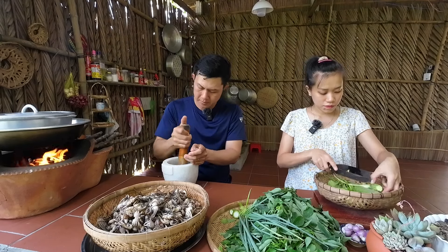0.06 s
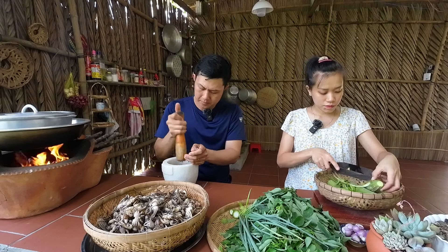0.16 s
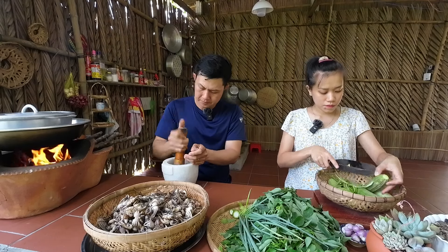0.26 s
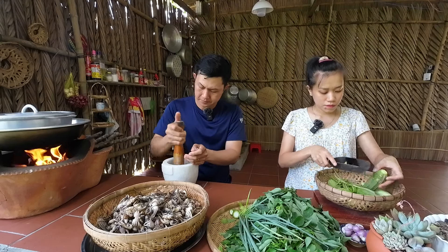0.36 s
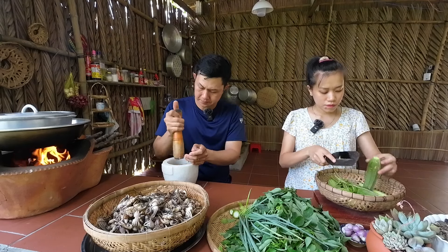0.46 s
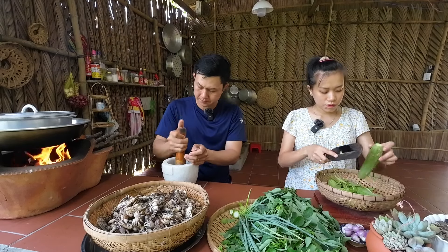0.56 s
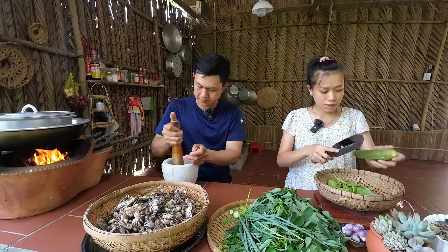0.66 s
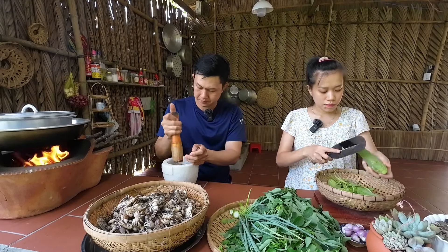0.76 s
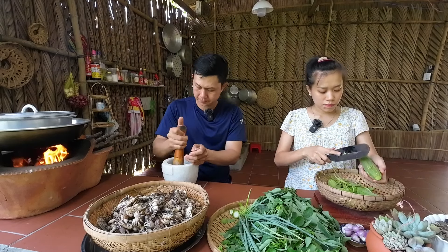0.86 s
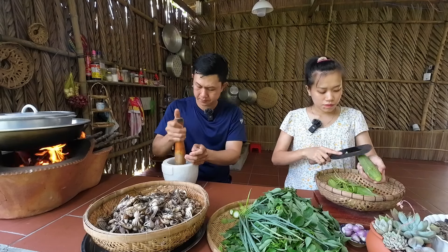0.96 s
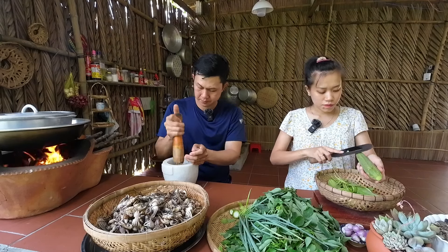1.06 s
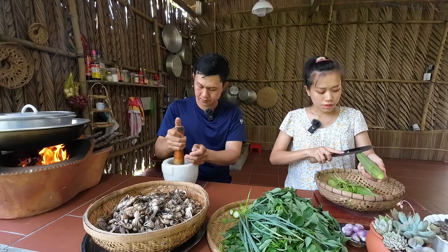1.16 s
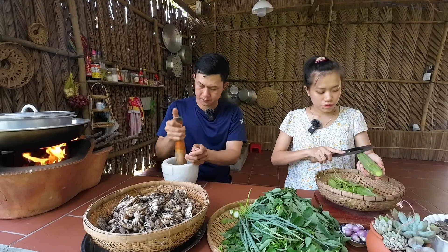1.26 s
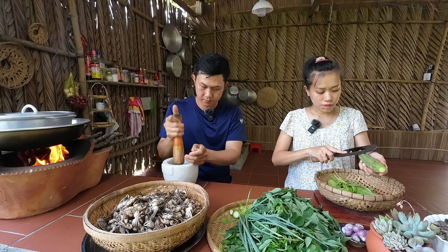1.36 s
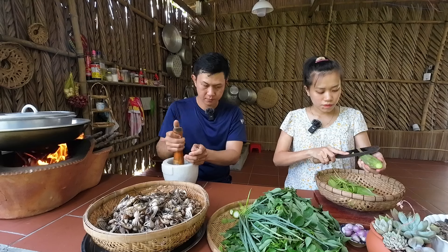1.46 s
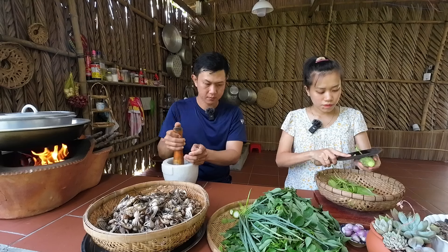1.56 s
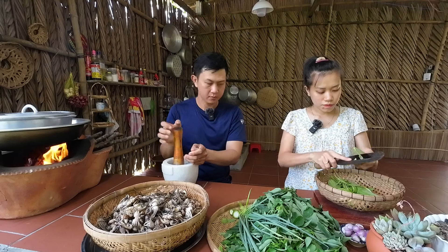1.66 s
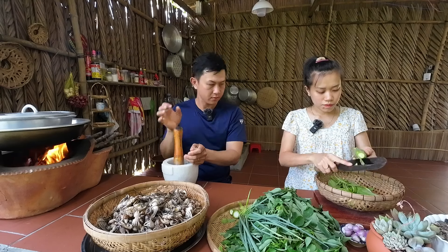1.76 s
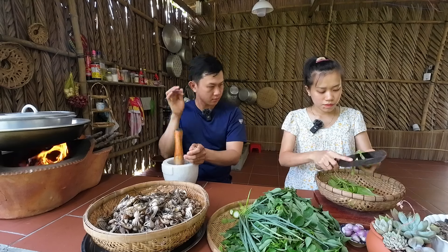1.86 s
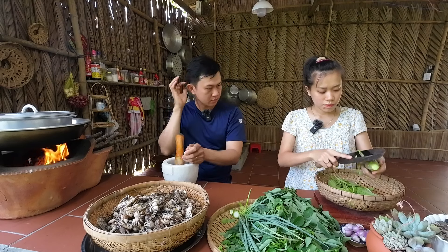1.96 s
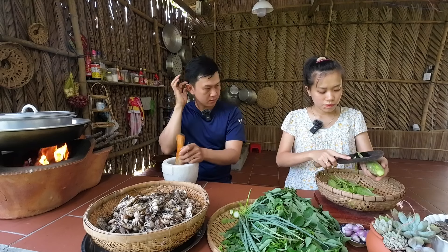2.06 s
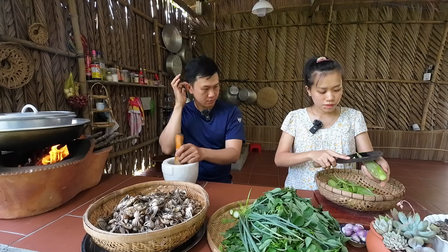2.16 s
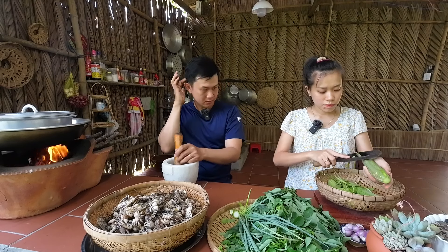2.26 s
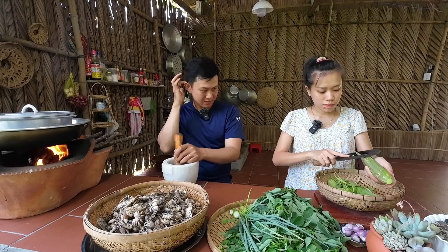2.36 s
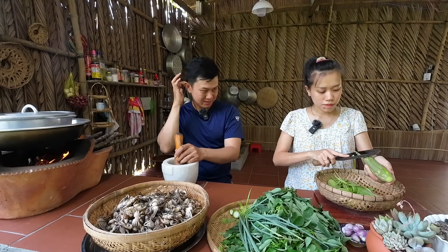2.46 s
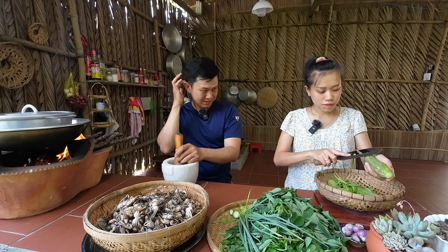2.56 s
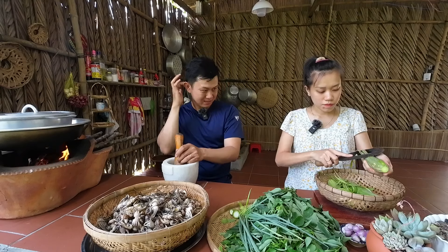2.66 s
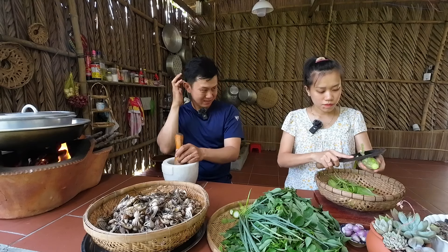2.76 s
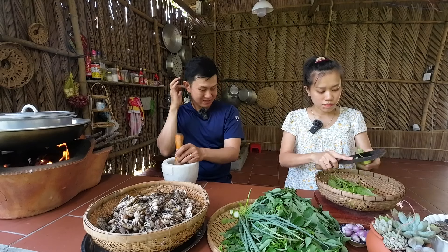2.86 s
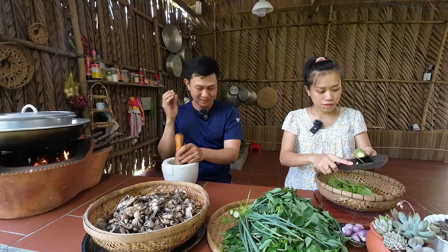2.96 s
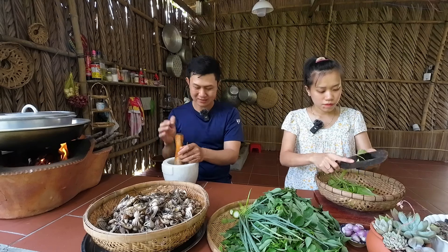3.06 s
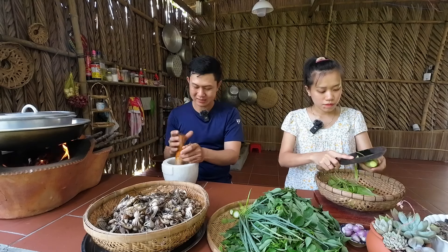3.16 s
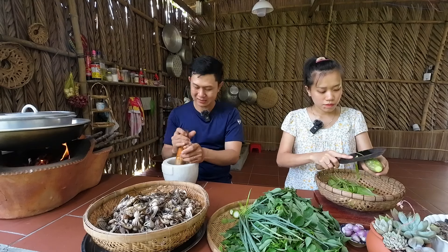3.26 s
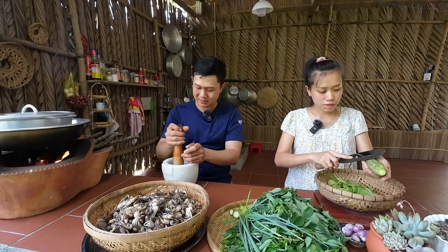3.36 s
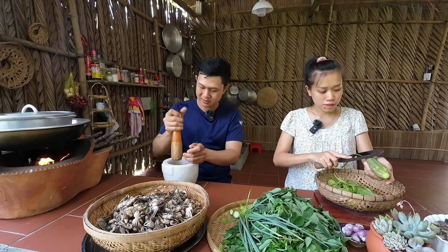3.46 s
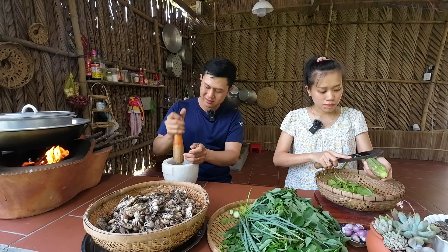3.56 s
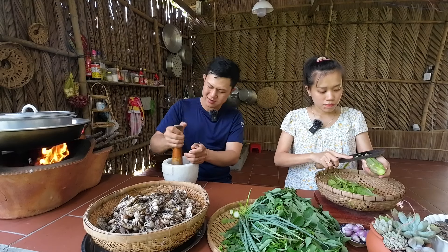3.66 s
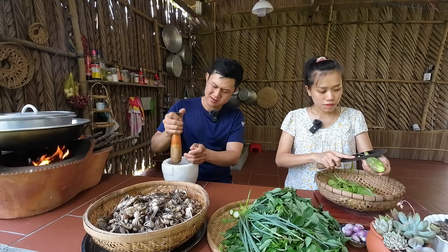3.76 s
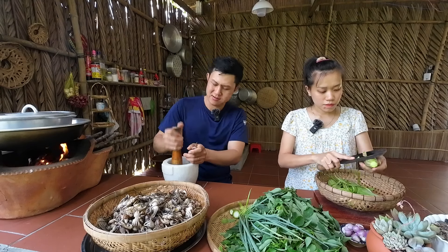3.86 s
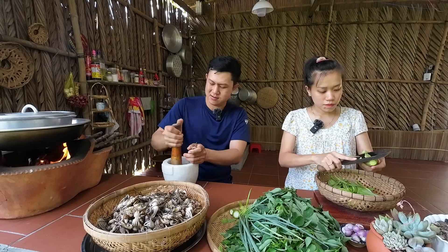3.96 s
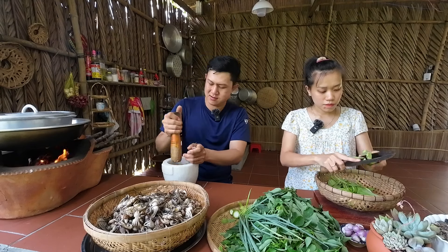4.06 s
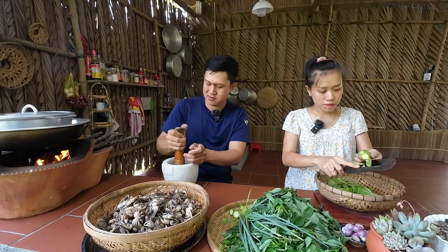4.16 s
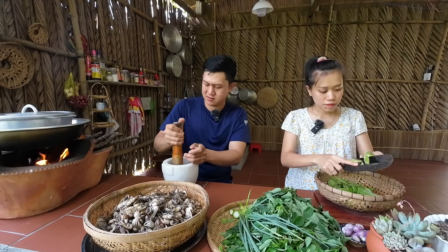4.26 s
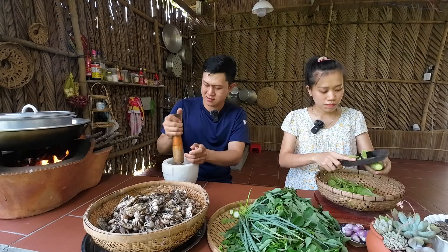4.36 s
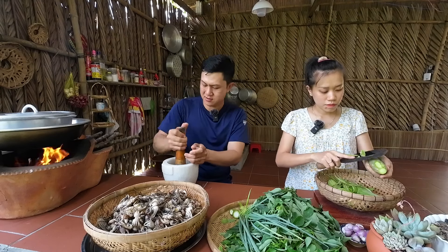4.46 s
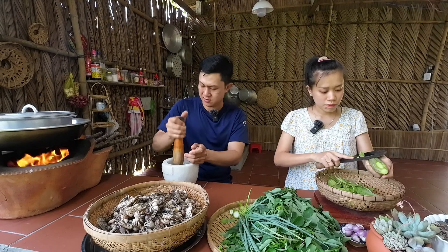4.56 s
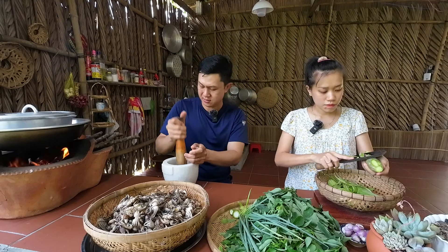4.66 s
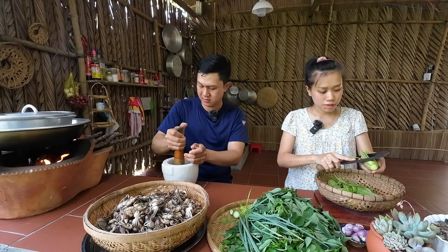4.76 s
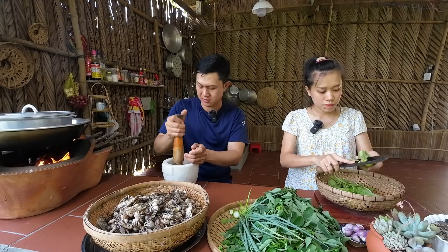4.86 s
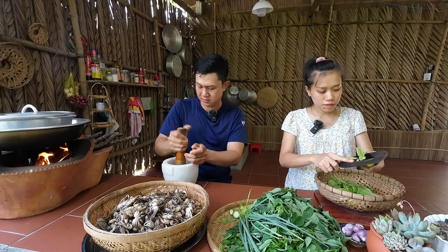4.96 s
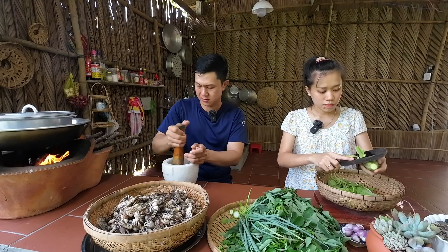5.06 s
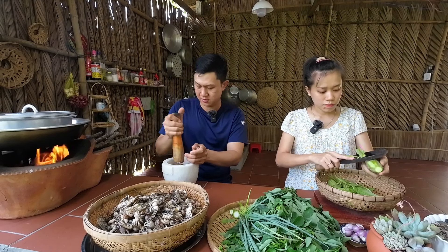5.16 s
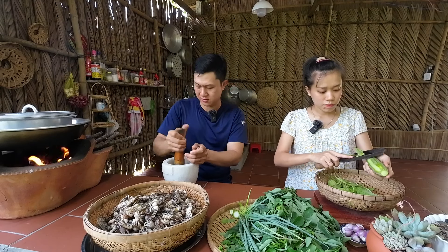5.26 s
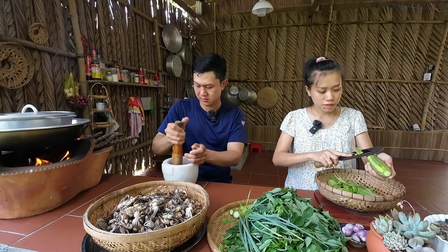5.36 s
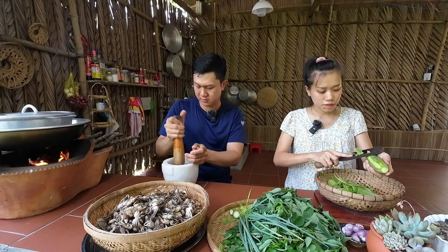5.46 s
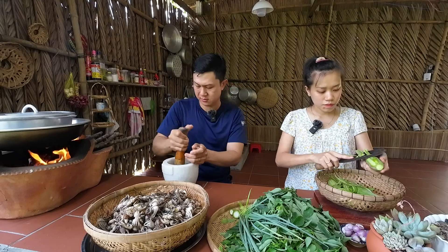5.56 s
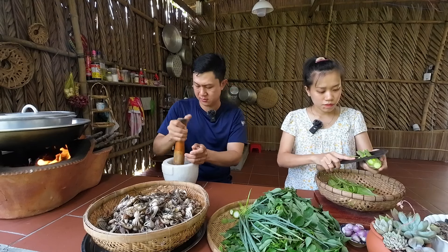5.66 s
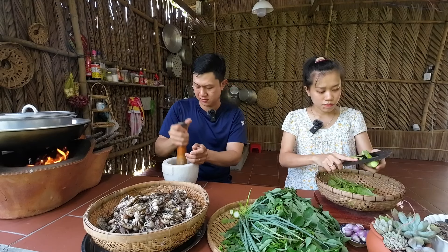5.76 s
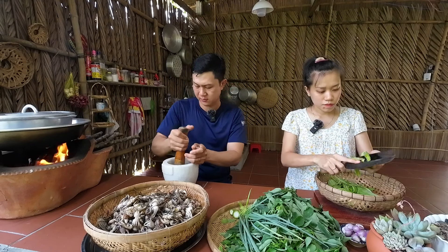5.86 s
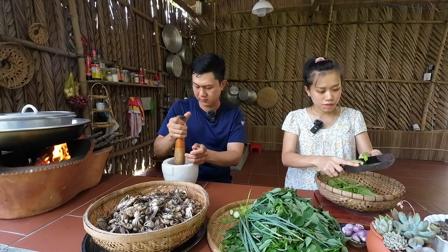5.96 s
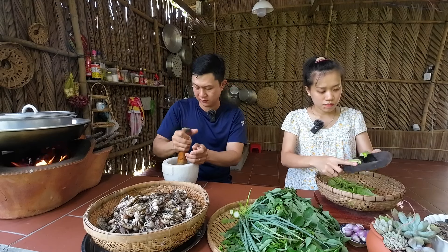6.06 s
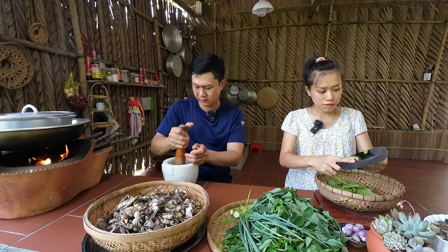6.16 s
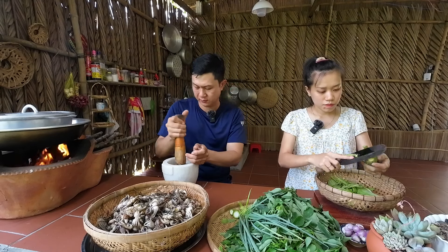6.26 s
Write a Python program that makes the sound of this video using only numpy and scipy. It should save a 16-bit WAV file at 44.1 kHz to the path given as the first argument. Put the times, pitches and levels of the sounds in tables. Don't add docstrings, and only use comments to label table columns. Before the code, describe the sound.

Crisp shell crunches and stone knocks come at a steady pace, with splinters snapping and crumbs settling. They stop after a second and a half; the pestle clatters loosely and only peeling strokes, small taps and low fire noise remain. A short scrape restarts the pounding, now deeper, pastier, ringing and distorted at the peaks. Close microphone, short dry echo from thatch and tiles.

```python
import sys
import numpy as np
from scipy import signal
from scipy.fft import rfft, irfft
from scipy.io import wavfile
from scipy.ndimage import uniform_filter1d

SR = 44100
rng = np.random.default_rng(int(sys.argv[2]) if len(sys.argv) > 2 else 0)


def undo_db(level):
    steps = np.asarray(level, float) / 20
    return 10 ** steps


def dump(signal):
    limited = np.clip(np.atleast_2d(signal).T, -1, 1)
    pcm = np.round(limited * 32767).astype(np.int16)
    wavfile.write(sys.argv[1], SR, pcm)


N = 279064

# first touch of shell in [s], stone contact level in [dB], crush time in [ms],
# crunch level in [dB], pitch of the shell cups in [Hz].
PESTLE_BLOWS = [(0.0144, -15, 5.9, 4, 1890), (0.3017, -15.5, 4.3, 2.5, 2860), (0.5767, -17.5, 7.1, 1, 1840),
                (0.8574, -14, 6.5, 5, 2000), (1.1475, -10.5, 5.4, 3, 1750), (1.4476, -1, 2.95, 4.5, 1580),
                (3.648, -1.5, 3.3, 2.5, 1830), (3.9097, -7.5, 2.27, 3.5, 3000),
                (4.183, -3.5, 4.4, 3.5, 1710), (4.4617, 0.5, 2.65, 4.5, 1840), (4.7383, 2.5, 2.6, 5, 1790),
                (5.0073, 10, 3.3, 4, 1370), (5.2765, 1.9, 2.06, 4.5, 1750), (5.5534, 10, 3.8, 6, 1630),
                (5.8251, 0.2, 3.4, -6.5, 1640), (6.0941, 4.5, 3.1, -1.5, 1790)]
STONE_AFTER_S = .0022
CUP_HZ = 1750


def evened(x):
    return x / np.sqrt(np.mean(x ** 2) + 1e-20)


def read(points, hz):
    f, value = np.transpose(points)
    return np.interp(np.log(hz + 1), np.log(f + 1), value)


def add(mix, s, sound):
    part = mix[max(round(s * SR), 0):][:len(sound)]
    part += sound[:len(part)]


def resonate(x, hz, width):
    turn = np.exp(2j * np.pi * hz * np.arange(len(x)) / SR)
    r = np.exp(-np.pi * width / SR)
    return 2 * (turn * signal.lfilter([1 - r], [1, -r], x / turn)).real


def through(x, peaks):
    return sum(undo_db(db) * resonate(resonate(x, hz, w), hz, w) for hz, w, db in peaks)


def crackle(size, spread_db, density):
    luck = rng.random((size, 3))
    height = undo_db(-spread_db * np.log(1 - luck[:, 0]))
    sign = np.sign(luck[:, 1] - .5)
    return evened(height * sign * (luck[:, 2] < density))


def ring(hz, db, t60, swing, uneven_db):
    t = np.arange(SR // 3)[:, None] / SR
    db = db + uneven_db * rng.standard_normal(len(hz))
    soft = 1 - np.exp(-(t / .0002) ** 2)
    return (swing * soft * undo_db(db - 60 * t / t60) * np.sin(2 * np.pi * hz * t)).sum(1)


def air():
    # frequency in [Hz], level in [dB per Hz].
    colour = [(15, -46), (25, -10), (53, -10.5), (185, -1), (317, -6), (373, -4), (531, -7), (775, -6.5),
              (1130, -9.5), (2000, -14), (2220, -14.5), (2690, -16.5), (16000, -28.5)]
    air_db = -42
    frames, hz = N // 256 + 5, np.fft.rfftfreq(1024, 1 / SR)
    a, b, patches = rng.standard_normal((frames, 513, 3)).T
    patches = evened(uniform_filter1d(uniform_filter1d(patches, 14, 0), 12, 1))
    z = (a + 1j * b) * undo_db(read(colour, hz)[:, None] + 1.3 * patches)
    return undo_db(air_db - 2.5) * evened(signal.istft(z, nperseg=1024, noverlap=768)[1][:N])


def hut(x):
    # frequency in [Hz], t60 in [s].
    reverb = [(100, 0.34), (260, 0.4), (700, 0.17), (1840, 0.34), (4850, 0.47), (12800, 0.32)]
    taps = np.zeros(SR // 2)
    at = np.arange(300, len(taps) - 20, 20)
    taps[at + rng.integers(0, 20, len(at))] = rng.choice([-1., 1.], len(at))
    hz, t, z = signal.stft(taps, SR, nperseg=256)
    tail = signal.istft(z * undo_db(-60 * t / read(reverb, hz)[:, None]), SR, nperseg=256)[1]
    return signal.fftconvolve(x, tail / np.linalg.norm(tail))[:N]


def bird():
    # start of the held note in [s], level in [dB], pitch in [Hz], held time in [s].
    whistles = [
        (.13, -45.5, 1130, 0.04),
        (.75, -36, 1193, .003),
    ]
    rise_s, fall_s, echo_s, echo_db = 0.029, 0.028, 0.077, -19
    scoop = 0.029
    mix = np.zeros(N)
    for s, db, hz, held_s in whistles:
        corners = np.cumsum([0, rise_s, held_s, fall_s, echo_s])
        t = np.arange(0, corners[-1], 1 / SR)
        shape_db = np.interp(t, corners, [echo_db, 0, 0, echo_db, echo_db])
        pitch = hz * (1 - scoop * np.exp(-t / rise_s))
        tone = np.sin(2 * np.pi * np.cumsum(pitch) / SR)
        add(mix, s - rise_s, undo_db(db + shape_db) * tone)
    return mix


def hiss(spectrum, patchy_db, flicker_db):
    frames, hz = N // 128 + 5, np.fft.rfftfreq(512, 1 / SR)
    a, b, patches = rng.standard_normal((frames, 257, 3)).T
    patches = evened(uniform_filter1d(uniform_filter1d(patches, 5, 0), 18, 1))
    flicker = evened(uniform_filter1d(rng.standard_normal(frames), size=3))
    z = (a + 1j * b) * undo_db(read(spectrum, hz)[:, None] + patchy_db * patches + flicker_db * flicker)
    return evened(signal.istft(z, nperseg=512, noverlap=384)[1][:N])


def knife():
    # start in [s], end in [s], level in [dB], swell over the stroke in [dB].
    pushes = [(0.235, 0.268, -42, 2), (1.352, 1.557, -44, 5), (1.564, 1.696, -38.5, -4),
              (1.87, 1.9, -44.5, 9), (2.5, 2.57, -51.5, 1), (2.633, 2.914, -37, -4.5),
              (3.585, 3.8, -46, -1), (3.801, 3.87, -37, 1), (3.899, 3.97, -36, -9),
              (4.057, 4.127, -41.5, 0), (4.642, 4.845, -37.5, 8), (5.283, 5.351, -37.5, 0),
              (5.448, 5.62, -40, 5), (5.613, 5.915, -41, -13)]
    # start in [s], end in [s], level in [dB].
    pulls = [
        (3.022, 3.273, -45.5),
        (3.28, 3.37, -44.5),
        (4.166, 4.398, -42.5),
        (4.465, 4.645, -45),
    ]
    # frequency in [Hz], level in [dB per Hz].
    thin_colour = [(400, -30), (800, -4), (1900, -5), (2400, -11), (3100, -5), (3900, -12), (9000, -10),
                   (12500, -8), (14000, -4), (14900, -1), (16000, -3)]
    wet_colour = [(800, -30), (1900, -9), (2800, -17), (4200, -14), (5300, -17), (9000, -10), (10500, -5),
                  (11700, 0), (12700, -2), (13500, -11), (16000, -17)]
    push_wet, pull_wet, pull_fade_db, grip_db = 0.03, 0.46, -9, 2.5
    strokes = [(*row, push_wet) for row in pushes] + [(*row, pull_fade_db, pull_wet) for row in pulls]
    thin, juicy = np.zeros((2, N))
    for start, end, db, swell_db, wet in strokes:
        level = undo_db(db + swell_db * np.linspace(-.5, .5, round((end - start) * SR)))
        add(thin, start, level * np.sqrt(1 - wet))
        add(juicy, start, level * np.sqrt(wet))
    cut = uniform_filter1d(thin, 1600) * hiss(thin_colour, 3.2, 1.8)
    cut = cut + uniform_filter1d(juicy, 2200) * hiss(wet_colour, 3.0, 1.4)
    grip = evened(uniform_filter1d(uniform_filter1d(rng.standard_normal(N), size=1500), size=1500))
    return undo_db(grip_db * grip) * cut


def drag():
    # time in [s], level in [dB].
    path = [
        (3.45, -60),
        (3.55, -48),
        (3.64, -40.5),
        (3.78, -50),
        (3.84, -42.5),
        (3.89, -46),
    ]
    # frequency in [Hz], width in [Hz], level in [dB].
    peaks = [(1650, 440, 6), (910, 430, 1), (3200, 980, -6.5)]
    level_db = np.interp(np.arange(N) / SR, *np.transpose(path), left=-99, right=-99)
    return undo_db(level_db) * evened(through(crackle(N, 1.2, 0.044), peaks))


def snaps():
    # start in [s], peak level in [dB], pitch in [Hz].
    ticks = [(.049, -25, 7000), (.243, -47, 12000), (.2875, -26, 11250), (.851, -29, 2000),
             (.861, 2.5, 2760), (.876, -21, 3200), (.895, -23, 2700), (.92, -29, 2000), (1.0, -44, 8000),
             (1.188, -29, 7000), (1.482, -18.5, 6200), (1.646, -39, 5500), (1.778, -29, 3200),
             (1.7807, -39, 5930), (2.048, -41, 7000), (3.1971, -35, 6500), (3.385, -42, 5500),
             (3.911, -10, 2170), (4.207, -30, 7000), (5.85, -37, 2600), (4.77, -21.5, 7960),
             (5.059, -23.5, 7750), (5.085, -34, 7040), (5.355, -31.5, 6500), (5.587, -24, 7100),
             (6.182, -35, 7500), (6.0921, -11.5, 4000)]
    cracks = [(.0225, -2.5, 5000), (.26, -36, 6000), (.294, -15, 5000), (.2965, -16, 4000),
              (.299, -11, 5000), (.333, -22, 4000), (.338, -17, 4000), (.572, -14, 9000),
              (.5863, -3.5, 7300), (.615, -19, 6050), (1.759, -35, 6000), (1.815, -34, 7000),
              (3.458, -35, 2000), (4.9117, -38, 5000), (5.6762, -15.5, 6900), (5.9494, -33, 5100),
              (6.086, -26, 7000)]
    dull_taps = [
        (1.7804, -32, 1370),
        (2.929, -33.5, 780),
        (4.0987, -29, 820),
        (4.104, -40, 850),
    ]
    mix, t = np.zeros(N), np.arange(600) / SR
    for rows, share in (ticks, 0.28), (cracks, 2.1), (dull_taps, 0.33):
        for s, db, hz in rows:
            burst = rng.standard_normal(len(t)) * np.exp(-t / 0.0025)
            click = through(burst, [(hz, share * hz, 0)])
            add(mix, s, undo_db(db) * click / abs(click).max())
    return mix


def crumbs():
    # frequency in [Hz], level in [dB per Hz].
    colour = [(300, -58), (900, 13), (1400, 9.5), (3000, 4), (4600, 0), (7500, -9), (11000, -9),
              (16000, -12)]
    splinters = [1850, 2470, 3480, 4570, 5360, 6500, 8200, 9700]
    level, t = np.zeros(N), np.arange(SR // 4) / SR
    for s, _, crush_ms, *_ in PESTLE_BLOWS:
        slow_db = -30.5 + 0.39 * crush_ms
        quick_shower = undo_db(-20 - 60 * t / 0.019)
        slow_shower = undo_db(slow_db - 60 * t / 0.29)
        add(level, s + STONE_AFTER_S, quick_shower + slow_shower)
    bits = sum(signal.lfilter(*signal.iirpeak(hz, 5, SR), crackle(N, 2.5, .004)) for hz in splinters)
    grains = rfft(level * (crackle(N, 2.37, 0.11) + undo_db(-5.0) * evened(bits)))
    return irfft(grains * undo_db(read(colour, np.fft.rfftfreq(N, 1 / SR))), N)


def crunch(crush_s, lead_s, hz, db, treble_db, cup_db):
    # frequency in [Hz], width in [Hz], level in [dB].
    shell = [(850, 328, 3.5), (1506, 910, -0.5), (3000, 1270, -4.5), (5750, 1200, -13), (7630, 3640, -1.5)]
    t = np.arange(-882, 1500) / SR
    press = np.exp(np.minimum(t, 0) / lead_s) / (1 + np.exp((t - crush_s) / .0005))
    cracks = press * crackle(len(t), 4.24, .5)
    mix = 0
    for f, width, peak_db in [(hz, 450, cup_db), *shell, (12000, 6000, treble_db - 4.0)]:
        mix = mix + undo_db(peak_db) * np.sqrt(width) * evened(through(cracks, [(f, width, 0)]))
    return undo_db(db - 45.0) * np.sqrt(np.mean(press ** 2)) * mix


def crushing():
    # time in [s], level in [dB].
    brittle = [(0, -8), (1.2, 5), (4.7, -14), (6.1, -7)]
    mix = np.zeros(N + 882)
    for s, contact_db, crush_ms, db, hz in PESTLE_BLOWS:
        cup_db = 3 - 9 * np.log2(hz / CUP_HZ) - 0.45 * contact_db
        treble_db = np.interp(s, *np.transpose(brittle))
        add(mix, s, crunch(crush_ms / 1000, .0008, hz, db, treble_db, cup_db))
    return mix[882:]


def body(thud_db, ring_db):
    # frequency in [Hz], level in [dB], t60 in [s],
    # first swing towards (+1) or away (-1).
    modes = [(117, -5.6, 0.019, -1), (160, -19.0, 0.236, 1), (192, -15.7, 0.146, 1), (214, -15.8, 0.119, 1),
             (258, -11.3, 0.124, 1), (362, -32.1, 0.4, -1), (376, -12.4, 0.041, 1), (428, -19.6, 0.175, 1),
             (517, -22.6, 0.176, -1), (527, -22.0, 0.18, -1), (576, -14.1, 0.113, -1),
             (669, -20.9, 0.121, -1), (686, -13.4, 0.088, -1), (772, -38.3, 0.374, -1),
             (809, -12.2, 0.059, -1), (879, -20.0, 0.039, 1), (996, -21.6, 0.041, 1),
             (1166, -26.0, 0.015, 1)]
    # frequency in [Hz], gain in [dB].
    mode_balance = [(117, 0.5), (160, -1), (200, -1.5), (258, -1.5), (430, 0), (520, -2), (690, 1.5),
                    (810, 3.5), (1000, -4)]
    hz, db, t60, swing = np.transpose(modes)
    db = db + read(mode_balance, hz) + np.where(hz < 400, thud_db, ring_db)
    return ring(hz, db, 0.93 * t60, swing, 1.5)


def pounding():
    # start in [s], table thud, bowl ring and pestle ring in [dB].
    knocks = [
        (1.8896, -12.5, -5, -16),
        (1.9314, -14.5, -17, -26),
        (1.9595, -14.5, -15.5, -35.5),
        (1.9747, -23, -34, -37),
    ]
    # frequency in [Hz], level in [dB], t60 in [s].
    pestle = [(2000, -3.5, 0.056), (4000, -21, 0.034), (1170, 4.5, 0.0067)]
    gripped_db = -20
    hits = list(knocks)
    wood = [(s, wood_db) for s, *_, wood_db in knocks]
    for s, contact_db, _, crunch_db, hz in PESTLE_BLOWS:
        thud_db = min(2 + 0.73 * contact_db + 5.5 * np.log2(hz / CUP_HZ), 3)
        hits.append((s + STONE_AFTER_S, thud_db, contact_db))
        wood.append((s, gripped_db + crunch_db))
    mix, push = np.zeros((2, N))
    first = np.exp(-(np.arange(SR // 3) / SR / .005) ** 2)
    for s, thud_db, ring_db, *_ in hits:
        sound = body(thud_db, ring_db)
        add(mix, s, sound)
        add(push, s, first * sound)
    for s, wood_db in wood:
        add(mix, s - .002, undo_db(wood_db) * ring(*np.transpose(pestle), 0.81, 2.8))
    return signal.lfilter(*signal.butter(2, 100.0 / SR * 2, "high"), [mix, push])


def scene():
    sharp = crushing() + snaps()
    heavy, push = pounding()
    echoes = hut(undo_db(-28) * sharp + undo_db(-5) * push)
    return (air() + bird() + knife() + drag() + crumbs() + sharp + heavy + echoes)[None]


def low_pass(x):
    return signal.sosfilt(signal.butter(12, 16250, fs=SR, output="sos"), x)


def record(dry):
    edge = signal.firwin(301, 15850, window=("kaiser", 9), fs=SR)
    x = np.clip(signal.oaconvolve(dry, edge[None], "same"), -1, 1)
    return low_pass(x)


dry = scene()
out = record(dry)
dump(out)
```